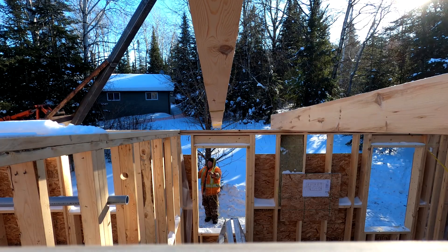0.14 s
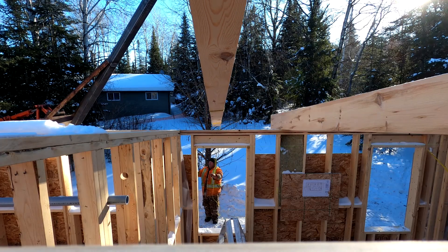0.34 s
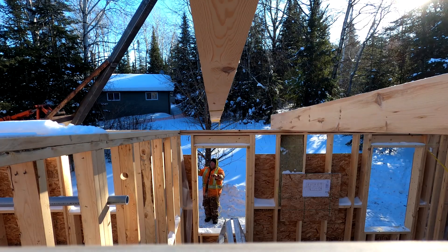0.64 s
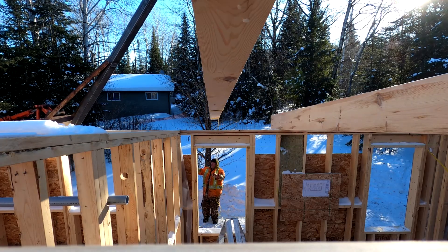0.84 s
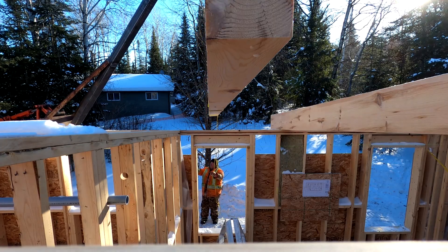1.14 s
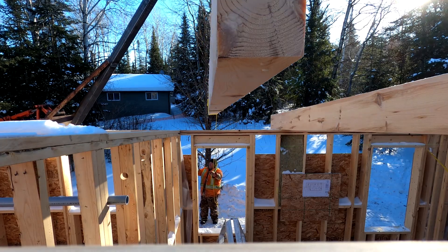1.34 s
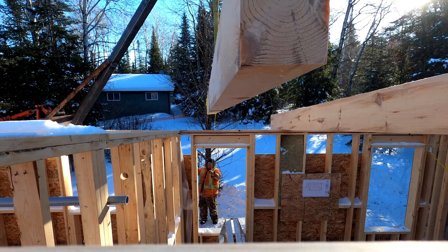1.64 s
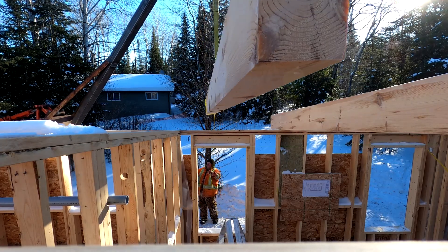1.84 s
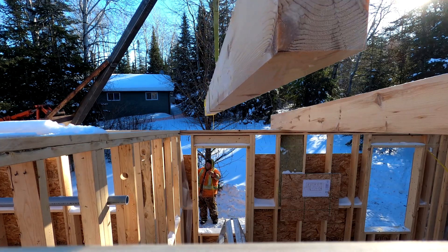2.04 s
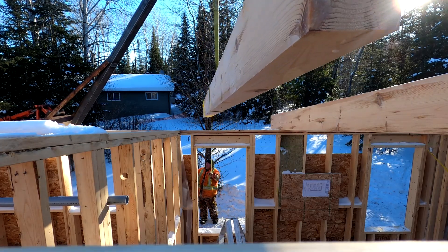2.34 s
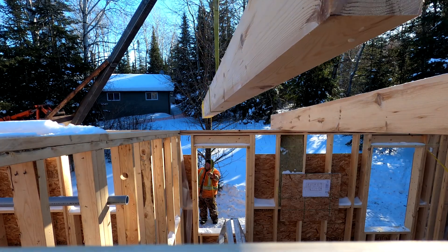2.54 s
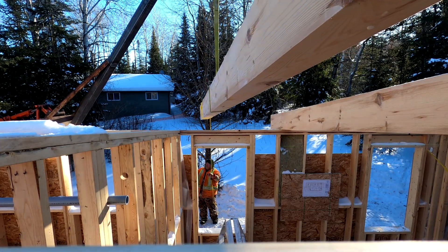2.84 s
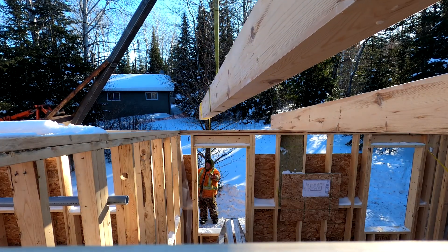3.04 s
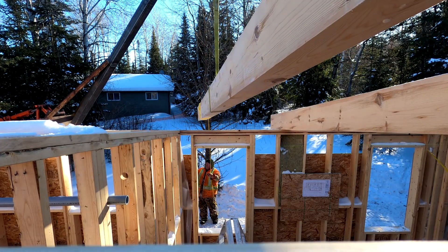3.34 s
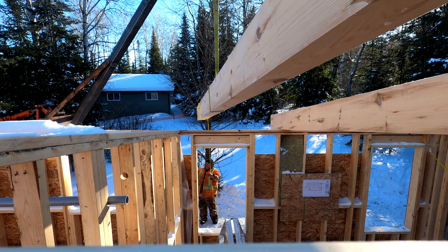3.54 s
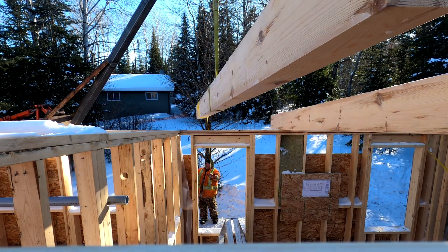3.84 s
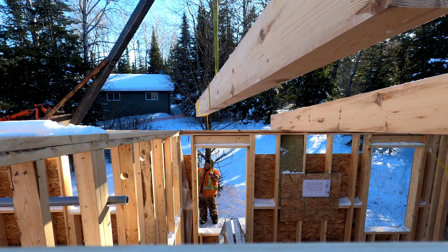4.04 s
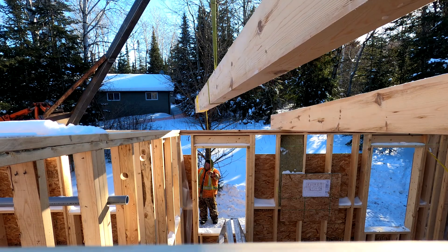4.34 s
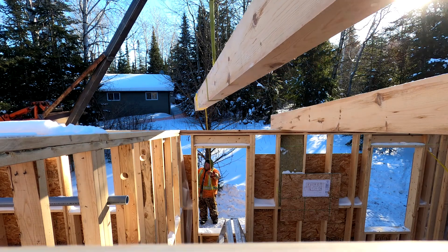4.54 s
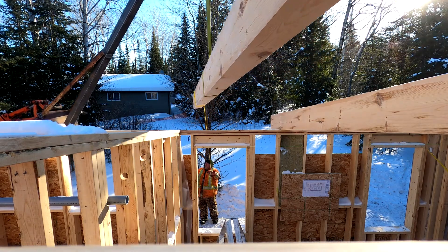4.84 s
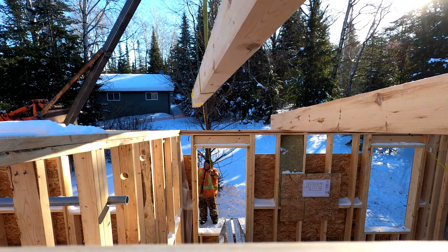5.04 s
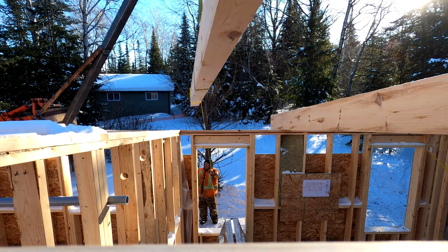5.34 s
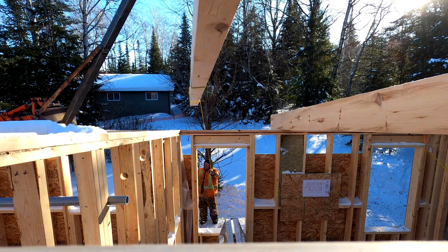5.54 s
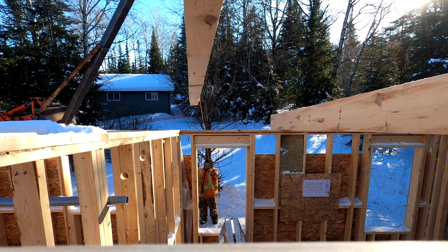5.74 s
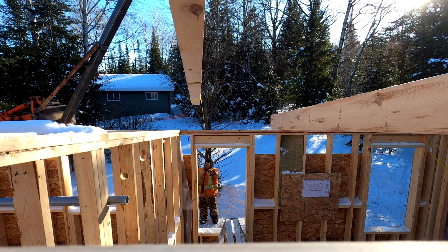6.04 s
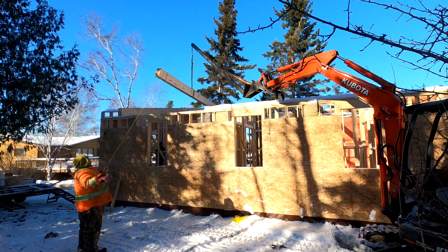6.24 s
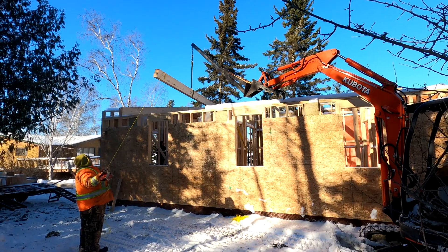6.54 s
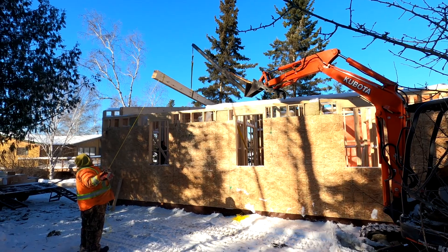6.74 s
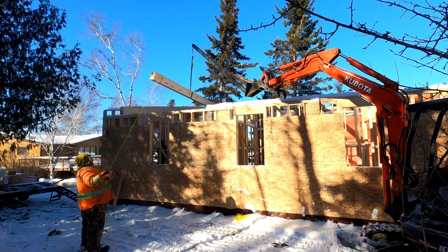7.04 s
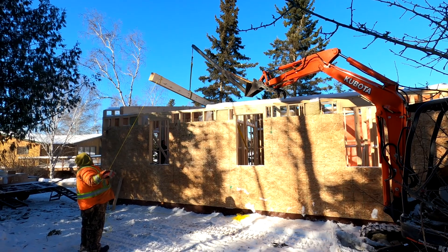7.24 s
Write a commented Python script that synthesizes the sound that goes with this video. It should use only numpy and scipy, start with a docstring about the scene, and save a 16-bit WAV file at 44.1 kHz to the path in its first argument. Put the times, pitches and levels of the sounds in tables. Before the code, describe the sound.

Muffled, slightly sagging diesel drone with low rumble, soft thuds and woody taps, cutting suddenly to a faster, brighter engine clatter nearby.

```python
"""Diesel excavator, from the timber frame to the machine's side

A four-cylinder diesel drones through a half-built timber house, sagging a little as its boom takes a load;
then, all at once, we stand close beside it and it runs faster. Tones locked to the firing rate make the drone;
firing-modulated noise makes clatter, hiss and combustion knock. Indoors, ringing modes make deck bumps and
wood knocks, and grainy noise the rustles. Low rumble runs under both places, an oil-valve hiss near the end."""
import sys
import numpy as np
from scipy import signal
from scipy.fft import rfft, irfft
from scipy.io import wavfile
from scipy.ndimage import uniform_filter1d

SR = 44100
rng = np.random.default_rng(int(sys.argv[2]) if len(sys.argv) > 2 else 0)


def dump_mix(stems):
    """Bounce the given channels to the path in sys.argv[1] as a 16-bit WAV at rate SR."""
    frames = np.atleast_2d(stems).T  # one column per channel
    limited = np.clip(frames, -1, 1)  # hard clip at full scale
    pcm = np.round(limited * 32767).astype(np.int16)
    wavfile.write(sys.argv[1], SR, pcm)


N = 326340
T = np.arange(N) / SR
FREQ = np.maximum(np.fft.rfftfreq(N, 1 / SR), 1)

MOVE_S, CHANGE_S = 6.1285, .00012  # start and length of the jump between places
TOP_HZ = 14900

# In the spectra below, density_db is the relative level per Hz.
# Exhaust, fan and pump tones heard indoors, relative to the exhaust level:
# firing_multiple, before_turn_db, midway_db, after_turn_db
FAR_TONES = [(1, 1, .7, 1), (2, -12, -9, -8.7), (3, -13, -17, -17), (4, -26.5, -30, -21),
             (4.25, -19, -19, -19.5), (5, -33, -38, -29), (6, -35, -26, -33), (7, -32, -35, -30.5),
             (8, -28, -42, -48), (9, -30, -47, -36.5), (11, -37, -41, -36), (12, -43, -40, -45),
             (13, -38, -50, -44), (15, -42, -50, -36), (17, -52, -47, -36.5), (20, -36, -47, -47),
             (21, -37, -39, -43), (22, -48, -41, -47), (23, -43, -50, -50), (24, -54, -45, -50),
             (26, -52, -52, -43)]
# The same tones close by: firing_multiple, level_db
NEAR_TONES = [(1, 2), (1.75, -30), (2, -10.5), (2.5, -28), (2.75, -27), (3, -11), (3.25, -25), (3.5, -30),
              (3.75, -27), (4, -18.5), (4.25, -21), (4.75, -24.5), (5, -26), (5.5, -29), (6, -32), (7, -33),
              (9, -28.5), (10, -27), (14.25, -32), (17, -30), (18.75, -41)]
# Engine speed indoors, sagging as the boom takes the load: time_s, firing_rate_hz
FAR_SPEED = [(0, 64.6), (1.5, 64.55), (1.9, 64.15), (2.7, 62.9), (3.3, 62.8), (3.7, 62.15), (4.2, 62.15),
             (6, 62.35)]
NEAR_FIRING_HZ = 73.93
# The machine turns with the beam: time_s, turn_share (0-1)
TURN = [(1.5, 0.1), (2.4, 0.6), (3.1, .5), (4.0, 0.91)]
# Exhaust level inside the frame: time_s, level_db
FAR_EXHAUST = [(0.25, -27), (0.7, -29.5), (1.15, -26.5), (2.1, -25), (3.3, -25.5), (4.1, -26.5), (4.8, -25),
               (6.1, -25)]
# Mechanical level inside the frame, for block, panels and hiss together: time_s, level_db
FAR_CLATTER = [(0.0, -53), (0.85, -54.5), (1.9, -55.5), (3.8, -54.5), (4.7, -53.5), (6.1, -53.5)]
FAR_HISS_DB, PANEL_DB = -8, -4  # relative to the clatter
NEAR_EXHAUST_DB, NEAR_CLATTER_DB, NEAR_HISS_DB = -16.5, -35, -48.5

# Engine block and panels, indoors and close by: freq_hz, density_db
FAR_BLOCK_SPECTRUM = [(90, -24), (150, 15.5), (250, 13.5), (340, 7.5), (480, 2), (700, -1.5), (950, -7),
                      (1350, -6), (1800, -12), (2300, -17), (3500, -55.5), (12000, -76)]
NEAR_BLOCK_SPECTRUM = [(60, 12), (105, 13), (165, 10.5), (195, 17), (222, 23), (275, 12.5), (400, 7),
                       (560, 1), (800, 0), (1100, -1.5), (1350, -3), (1800, -7.5), (2200, -18.5),
                       (3500, -50.5), (12000, -75)]
# Injectors, valves and cooling air, indoors and close by: freq_hz, density_db
FAR_HISS_SPECTRUM = [(1200, -17.5), (2000, -1), (2300, 1), (2700, 4.5), (3100, 1), (4300, -2), (5300, -7),
                     (6900, -14), (8500, -16), (9500, -23), (11500, -31), (14000, -56.5)]
NEAR_HISS_SPECTRUM = [(1500, -11), (2250, -6), (2700, 8), (3050, 1.5), (3500, 5.5), (4000, 1), (4900, 1.5),
                      (6000, -13), (7500, -15), (8800, -19.5), (9700, -28), (10400, -20), (11200, -23.5),
                      (14000, -31)]
# Side panels facing the house until the machine turns away: freq_hz, density_db
PANEL_SPECTRUM = [(250, -25), (430, -1), (560, 0.5), (720, -5), (900, -23.5), (1150, -13.5), (1330, -5.5),
                  (1550, -13.5), (2200, -48.5)]
# Hard knock of each combustion, heard close by: freq_hz, density_db
COMBUSTION_SPECTRUM = [(200, -25), (450, -2), (750, 1.5), (1300, 1), (1800, -12), (2300, -25), (3500, -29),
                       (7000, -56.5)]
COMBUSTION_DB, COMBUSTION_DECAY_S, COMBUSTION_SCATTER_DB = -40, .0032, 1.3
# Relative combustion strength, one entry per cylinder: level_db
CYLINDER_STRENGTHS = [-2, -4, 1, -.5]
# Hydraulic oil hissing as a valve opens: time_s, level_db
VALVE_LEVEL = [(6.96, -93.5), (6.99, -50), (7.08, -60), (7.3, -55.5)]
# Colour of that oil hiss: freq_hz, density_db
VALVE_SPECTRUM = [(1500, -30.5), (3000, 5), (5500, -5.5), (7000, -9), (9000, -11.5), (10000, -23.5),
                  (14000, -42.5)]

# Dull bumps on the floor deck: start_s, boom_peak_db, contact_s, creak_db (relative to the boom)
DECK_BUMPS = [(0.01, -18, 0.015, -21), (0.062, -19, 0.0027, -13), (.122, -18.5, 0.016, -8),
              (0.143, -15, 0.0024, -12), (.263, -10, 0.0028, -21.5), (.276, -12.5, 0.003, -19),
              (0.323, -16, 0.0095, -29.5)]
# Deck resonances before each blow's detuning: pitch_hz, level_db, t60_s
DECK_MODES = [(59.6, -13, 0.2), (112, 15, 0.15), (137, 3.5, 0.15), (189, -20, 0.071), (255, -22, 0.027),
              (384.4, 1.5, 0.11), (520, -16.5, 0.042)]
# Creak of the bumped deck: freq_hz, density_db
CREAK_SPECTRUM = [(80, -21), (150, 4.5), (300, -1), (480, -13.5), (750, -20.5), (1500, -31.5),
                  (4000, -44.5), (14000, -87.5)]
# Light timber knocks: start_s, ring_peak_db, snap_db (relative to the ring), pitch_ratio
TIMBER_KNOCKS = [(1.426, -42, -3, .8), (1.85, -46.5, -8, .9), (4.529, -39, -8.5, 1), (4.67, -38, 2, .8),
                 (4.783, -33.5, -10, .98), (5.061, -35.5, -7, 1.05), (5.131, -35, -2, 1.2),
                 (5.166, -37.5, -8.5, 1.2), (5.2, -32.5, -19, 1), (5.237, -39, -3, 1.1),
                 (5.418, -47, -13.5, 0.9), (5.534, -35.5, -5, .95), (5.632, -36, -8, 1),
                 (5.676, -36.5, -7.5, 1), (5.702, -32.5, -8.5, 1.05), (5.708, -37, -6, 0.9),
                 (5.725, -33, -14.5, 0.92), (5.751, -25.5, -15.5, 1), (5.762, -37, -2, 1.1),
                 (5.846, -32, -2.5, .8), (5.91, -32.5, -5.5, .9), (5.917, -34.5, -7.5, 1.2),
                 (5.932, -38.5, -2.5, 1), (5.982, -30, -2.5, 0.87)]
# Timber resonances before pitch ratio and detuning: pitch_hz, level_db, t60_s
TIMBER_MODES = [(647, -1, 0.029), (810, 1.5, 0.024), (927, 12, .02), (1100, 4.5, 0.016),
                (1270, -2.5, 0.022), (1630, -2.5, 0.022), (2320, -8, 0.02), (2750, -7, .018)]
KNOCK_ATTACK_S, SNAP_DECAY_S = .0008, .0025
FRAME_DB, FRAME_DECAY_S = -24.5, 0.021  # reflections of each knock from the studs
# Brief rustles and scrapes: centre_s, half_length_s, level_db, centre_hz, width_octaves
RUBS = [(0.025, 0.053, -63, 5950, 0.51), (0.824, 0.044, -61, 2990, 0.58), (2.719, 0.12, -56, 3010, 0.65),
        (2.726, 0.11, -62.5, 4680, 0.15), (2.756, 0.085, -70.5, 8400, 0.2), (5.005, 0.017, -61.5, 4840, .6),
        (5.09, 0.042, -48.5, 1700, 0.63), (5.085, 0.035, -55, 2400, 0.2), (5.195, 0.07, -53, 1200, 0.76),
        (5.65, 0.099, -50, 1140, 0.75), (5.941, 0.091, -57, 1220, 0.94)]

# Steady low rumble: freq_hz, density_db
RUMBLE_SPECTRUM = [(12, -4), (25, 6.5), (40, 18), (65, 23), (100, 8), (150, -3), (220, -2), (320, -16),
                   (600, -62.5), (3000, -100)]
RUMBLE_FAR_DB, RUMBLE_NEAR_DB = -50.5, -49.5  # in the 82-108 Hz band, before flutter
FLUTTER_DB, FLUTTER_PER_S = 1.5, 12  # depth and rate of the rumble's wavering
# Swells of rumble, levels in the same band before flutter: crest_s, half_length_s, level_db
RUMBLE_SWELLS = [(0.125, 0.19, -33), (0.95, .05, -41), (1.68, 0.067, -39.5), (1.93, 0.036, -36),
                 (2.12, 0.11, -40.5), (2.375, 0.07, -37.5), (2.635, 0.06, -37), (2.915, 0.14, -35),
                 (3.18, 0.08, -37.5), (3.475, .04, -37.5), (3.922, 0.075, -37), (4.66, 0.09, -41.5),
                 (5.14, 0.1, -41), (5.87, 0.11, -39)]
# Colour of the swells: freq_hz, density_db
SWELL_SPECTRUM = [(12, 8.5), (25, 6), (40, 7.5), (65, 9), (100, 6.5), (150, 2), (220, -5), (320, -18.5),
                  (600, -43), (3000, -100)]

# Side against mid for scattered sound, before the opening: freq_hz, side_minus_mid_db
STEREO_WIDTH = [(60, -32), (270, -23), (800, -15), (1250, -7), (2000, -.5), (5600, -1)]
# Almost mono at first, opening out late: time_s, width_db
STEREO_OPENING = [(.3, -23), (.6, -42), (4.6, -42), (5.05, -17), (6.125, -7), (6.13, 0)]
# Breeze in the stereo side: freq_hz, density_db
BREEZE_SPECTRUM = [(15, 1), (35, 7), (80, 4.5), (160, -11), (300, -31), (700, -42), (2000, -66)]
BREEZE_DB = -38  # before the stereo opening


def engine_far():
    """Behind the walls the exhaust drones and the clatter is dull; turning changes which tones carry."""
    exhaust_db, clatter_db = curves(FAR_EXHAUST)[0], curves(FAR_CLATTER)[0]
    firings = np.cumsum(curves(FAR_SPEED)[0]) / SR
    turn = curves(TURN)[0]
    drone = 0
    for multiple, *stages_db in FAR_TONES:
        tone_db = np.interp(turn, [0, .5, 1], stages_db)
        drone = drone + tone(firings, multiple, tone_db, waver_db=.45, wander=.04)
    block_noise = clatter(firings, repeat=0.095, depth=1.0, decay=0.57, scatter_db=2.5)
    block = colour(block_noise, FAR_BLOCK_SPECTRUM, (700, 1800))
    hiss_noise = clatter(firings, repeat=0.03, depth=0.69, decay=0.36, scatter_db=3)
    hiss = colour(hiss_noise, FAR_HISS_SPECTRUM, (3000, 6000)) * undb(FAR_HISS_DB)
    panel_noise = clatter(firings, repeat=0.32, depth=.6, decay=.5, scatter_db=-2.0)
    panels = colour(panel_noise, PANEL_SPECTRUM) * undb(PANEL_DB) * (1 - turn)
    return drone * undb(exhaust_db) + (block + panels + hiss) * undb(clatter_db)


def engine_near():
    """Beside the machine the exhaust is loud and the diesel knock is open and bright."""
    firings = NEAR_FIRING_HZ * T
    drone = sum(tone(firings, multiple, db, waver_db=.5, wander=0.1) for multiple, db in NEAR_TONES)
    block_noise = clatter(firings, repeat=0.39, depth=0.2, decay=0.26, scatter_db=-1)
    block = colour(block_noise, NEAR_BLOCK_SPECTRUM, (500, 2000)) * undb(NEAR_CLATTER_DB)
    ticking = clatter(firings, repeat=.2, depth=.5, decay=.3, scatter_db=2)
    hiss = colour(ticking, NEAR_HISS_SPECTRUM, (2500, 6000)) * undb(NEAR_HISS_DB)
    oil = colour(rng.standard_normal(N), VALVE_SPECTRUM) * undb(curves(VALVE_LEVEL)[0])
    return drone * undb(NEAR_EXHAUST_DB) + block + combustion(firings) + hiss + oil


def tone(firings, multiple, db, waver_db, wander):
    """A line locked to the four-firing cycle; upper ones waver more than the firing note."""
    loose = min(np.log2(multiple) + 0.19, 2)
    order = np.round(multiple * 4) / 4
    # the lowest whole multiples rise together: a steep-fronted exhaust puff
    offset = 0 if order in (1, 2, 3, 4) else rng.random()
    phase = 2 * np.pi * (order * firings + offset)
    level = np.sqrt(2) * undb(db + waver_db * loose * walk(5))
    return level * np.sin(phase + wander * loose * walk(8.3))


def clatter(firings, repeat, depth, decay, scatter_db):
    """Each firing rattles the metal; part of the rattle repeats with every four-cylinder cycle."""
    size = 2800  # points in one cycle
    bins = np.arange(size // 2 + 1)
    partials = np.exp(2j * np.pi * rng.random(len(bins))) * (bins > 28)  # upper rattle only
    cycle = np.interp(firings / 4 % 1 * size, np.arange(size), irfft(partials))
    stroke = firings.astype(int)
    cylinder_db = np.array([-7.5, -13.5, -4.5, -7.0])[stroke % 4]
    strength_db = cylinder_db + scatter_db * rng.standard_normal(stroke[-1] + 1)[stroke]
    blow = 1 + depth * undb(strength_db) * np.exp(-(firings % 1) / decay)  # decay in firing periods
    repeat = np.clip(repeat, 0, 1)
    return blow * (np.sqrt(repeat) * unit(cycle) + np.sqrt(1 - repeat) * rng.standard_normal(N))


def combustion(firings):
    """One short knock per firing; each cylinder has its own strength and no two strokes are alike."""
    stroke = firings.astype(int)
    scatter_db = COMBUSTION_SCATTER_DB * rng.standard_normal(stroke[-1] + 1)[stroke]
    strength_db = np.array(CYLINDER_STRENGTHS)[stroke % 4] + scatter_db
    since_firing_s = (firings % 1) / NEAR_FIRING_HZ
    bursts = undb(strength_db) * np.exp(-since_firing_s / COMBUSTION_DECAY_S)
    return colour(bursts * rng.standard_normal(N), COMBUSTION_SPECTRUM) * undb(COMBUSTION_DB)


def bumps():
    """Soft blows set the floor deck booming and creaking."""
    out, t = np.zeros(N), np.arange(SR // 3) / SR
    for start_s, db, contact_s, creak_db in DECK_BUMPS:
        push = np.sin(np.pi * np.minimum(t / contact_s, 1))  # a longer push is duller
        boom = signal.fftconvolve(ring(DECK_MODES, t), push)[:len(t)]
        creak = colour(rng.standard_normal(N), CREAK_SPECTRUM)[:len(t)]
        creak = creak * np.exp(-t / 0.024) * (1 - np.exp(-t / 0.00088))
        add(out, start_s, undb(db) * (boom / np.abs(boom).max() + undb(creak_db) * creak))
    return out


def knocks():
    """Light blows on timber: a snap at contact, a short woody ring and faint reflections from the frame."""
    out, t = np.zeros(N), np.arange(SR // 8) / SR
    snap_band = signal.butter(3, [700, 3400], "band", fs=SR, output="sos")
    for start_s, db, snap_db, pitch_ratio in TIMBER_KNOCKS:
        # soft wood gives a little, so the ring starts gently
        wood = ring(TIMBER_MODES, t * pitch_ratio) * (1 - np.exp(-t / KNOCK_ATTACK_S))
        contact = undb(snap_db) * np.exp(-t / SNAP_DECAY_S)
        reflections = undb(FRAME_DB) * np.exp(-t / FRAME_DECAY_S)
        snap = signal.sosfilt(snap_band, rng.standard_normal(len(t)) * (contact + reflections))
        add(out, start_s, undb(db) * (wood / np.abs(wood).max() + snap))
    return out


def rustles():
    """Rubbing surfaces: dense grains that swell and fade; the lower scrapes catch and slip more."""
    out = 0
    for centre_s, half_s, db, hz, octaves in RUBS:
        grain_db = 2.2 if hz < 2500 else 1.8
        grains = rng.standard_normal(N) * undb(grain_db * walk(250))
        band = np.exp(-.5 * (np.log2(FREQ / hz) / octaves) ** 2)
        rub = irfft(rfft(grains) * band, N)
        out = out + unit(rub) * undb(db) * swell(centre_s, half_s)
    return out


def rumble():
    """A low, fluttering noise bed with separately coloured swells on top."""
    bed_db = np.where(T < MOVE_S, RUMBLE_FAR_DB, RUMBLE_NEAR_DB)
    bed = colour(rng.standard_normal(N), RUMBLE_SPECTRUM, (82, 108)) * undb(bed_db)
    power = sum((undb(db) * swell(crest_s, half_s)) ** 2 for crest_s, half_s, db in RUMBLE_SWELLS)
    swells = colour(rng.standard_normal(N), SWELL_SPECTRUM, (82, 108)) * np.sqrt(power)
    return (bed + swells) * undb(FLUTTER_DB * walk(FLUTTER_PER_S))


def ports(x, pan_db):
    """Two close ports: scattered reflections and breeze, opposite in sign, make them differ."""
    t = np.arange(SR // 20) / SR
    scatter = rfft(rng.standard_normal(len(t)) * np.exp(-t / .012), N)
    # level lean between the ports, centred on 800 Hz
    shade = np.exp(-np.log2(FREQ / 800) ** 2) * np.tanh(pan_db * np.log(10) / 40)
    side_response = response(STEREO_WIDTH) * scatter / np.abs(scatter) + shade
    side = irfft(rfft(x) * side_response, N)
    side += colour(rng.standard_normal(N), BREEZE_SPECTRUM) * undb(BREEZE_DB + 2.5 * walk(6))
    side *= undb(curves(STEREO_OPENING)[0])
    return np.array([x + side, x - side])


def ring(modes, t):
    """Free decay of a struck object; every blow weights and detunes the modes a little differently."""
    out = 0
    for hz, db, t60_s in modes:
        detune = 1 + .02 * rng.standard_normal()
        level = undb(db + 2 * rng.standard_normal())
        out = out + level * np.sin(2 * np.pi * hz * detune * t) * np.exp(-np.log(1000) * t / t60_s)
    return out


def swell(centre_s, half_s):
    """A smooth bell-shaped rise and fall in time."""
    return np.exp(-.5 * ((T - centre_s) / half_s) ** 2)


def walk(rate):
    """Random levels, rate new ones a second, smoothed twice and scaled to rms 1."""
    hold = int(SR / rate)
    steps = np.repeat(rng.standard_normal(N // hold + 2), hold)
    smooth = uniform_filter1d(uniform_filter1d(steps, hold), hold)
    return unit(smooth[hold // 2:N + hold // 2])


def colour(x, points, band=None):
    """Filter by a spectrum, scaled to rms 1 overall or within the given band in Hz."""
    spectrum = rfft(x) * response(points)
    inside = 1 if band is None else (FREQ > band[0]) & (FREQ < band[1])
    return irfft(spectrum, N) / np.std(irfft(spectrum * inside, N))


def response(points):
    """Gain at every frequency, from levels joined along a log-frequency axis."""
    hz, db = np.transpose(points)
    return undb(np.interp(np.log(FREQ), np.log(hz), db))


def curves(table):
    """Each column of a table, joined by straight lines in time."""
    time_s, *columns = np.transpose(table)
    return [np.interp(T, time_s, column) for column in columns]


def add(track, start_s, sound):
    """Mix a sound into a track at its start time."""
    i = max(int(start_s * SR), 0)
    track[i:i + len(sound)] += sound[:N - i]


def undb(db):
    """Decibels to gain."""
    return 10 ** (np.asarray(db) / 20)


def unit(x):
    """Scale to rms 1."""
    return x / np.sqrt(np.mean(x ** 2))


def scene():
    """Inside the frame first, then all at once beside the machine, over a shared rumble."""
    near = np.clip((T - MOVE_S) / CHANGE_S, 0, 1)
    inside = engine_far() + bumps() + knocks() + rustles()
    return ports((1 - near) * inside + near * engine_near() + rumble(), pan_db=-4.5)


def record(dry):
    """A steep low-pass takes off the top of the treble."""
    return signal.sosfilt(signal.ellip(8, .2, 70, TOP_HZ, fs=SR, output="sos"), dry)


dry = scene()
out = record(dry)
dump_mix(out)
```